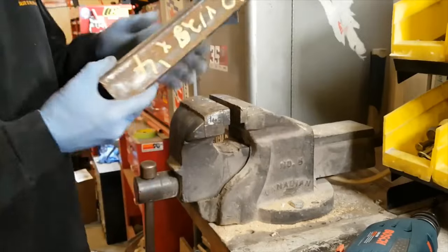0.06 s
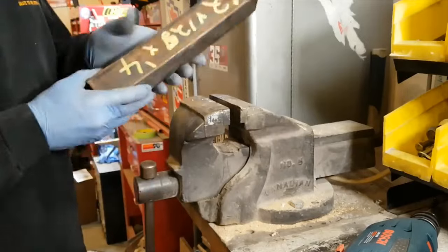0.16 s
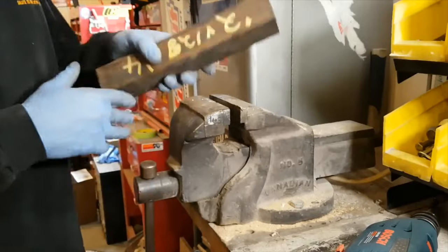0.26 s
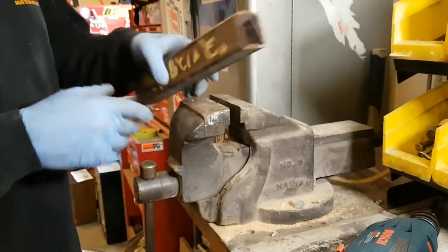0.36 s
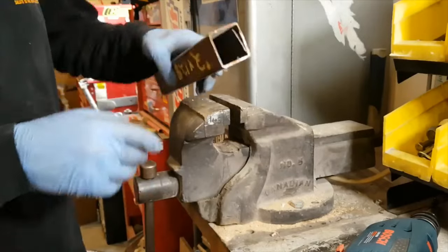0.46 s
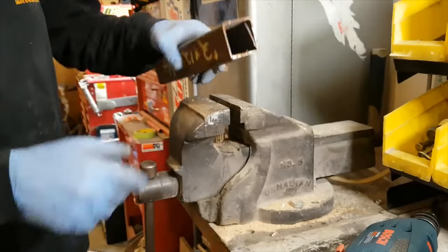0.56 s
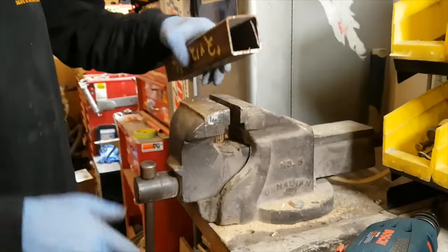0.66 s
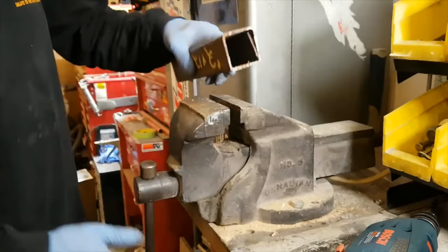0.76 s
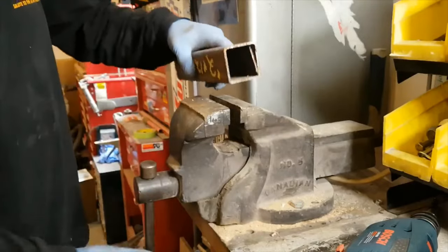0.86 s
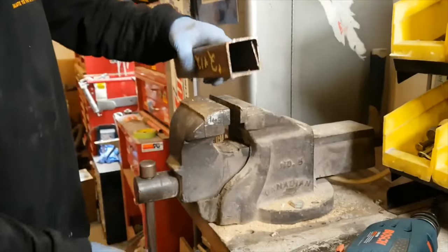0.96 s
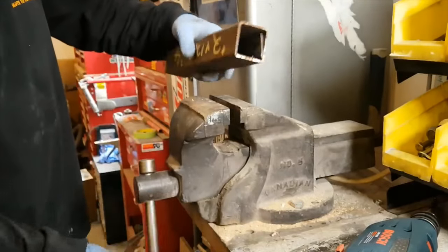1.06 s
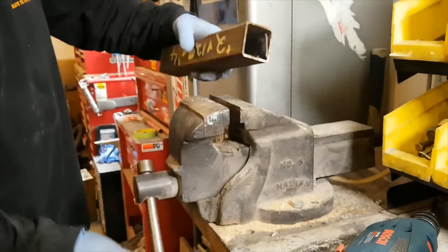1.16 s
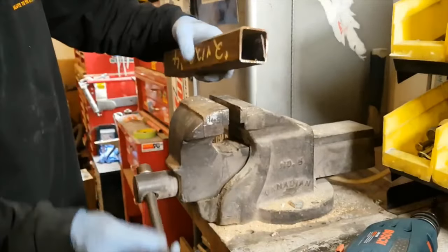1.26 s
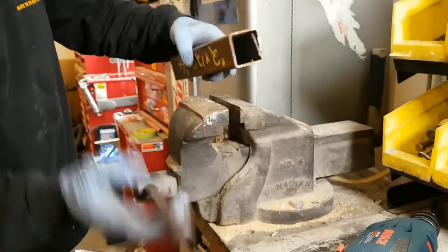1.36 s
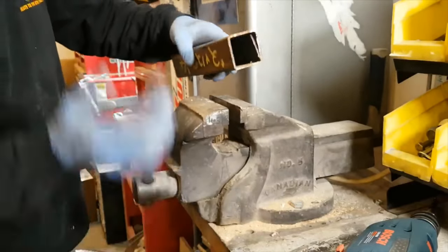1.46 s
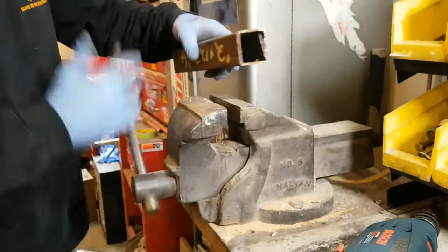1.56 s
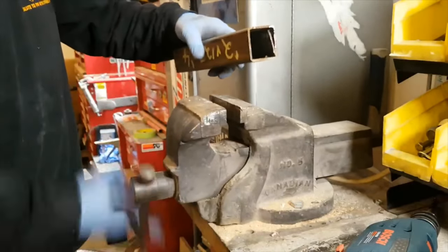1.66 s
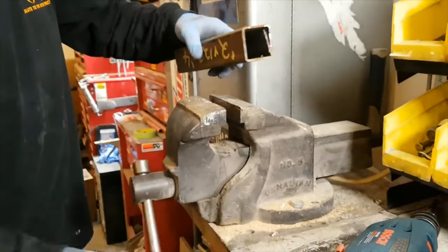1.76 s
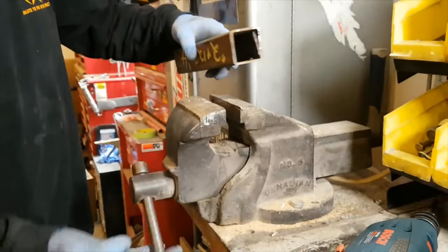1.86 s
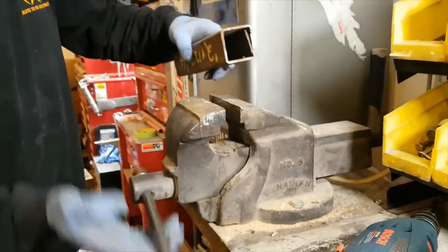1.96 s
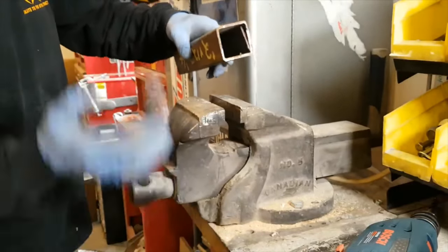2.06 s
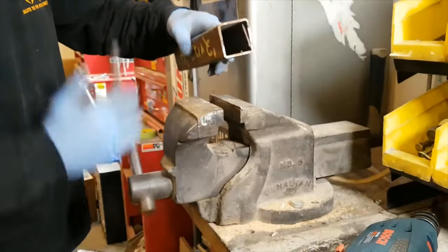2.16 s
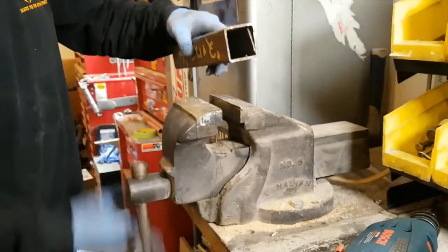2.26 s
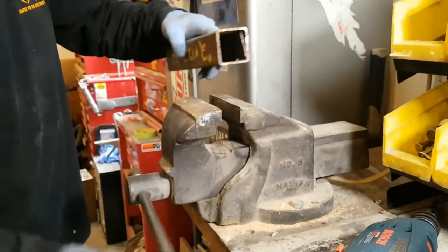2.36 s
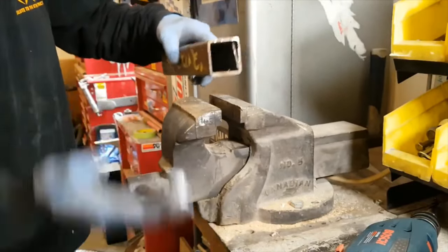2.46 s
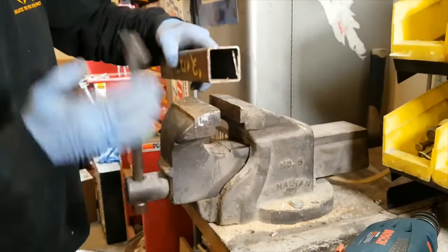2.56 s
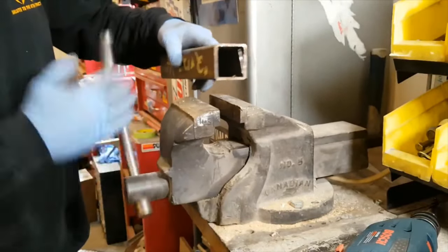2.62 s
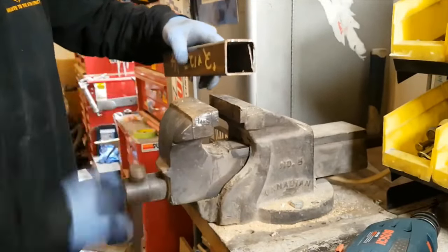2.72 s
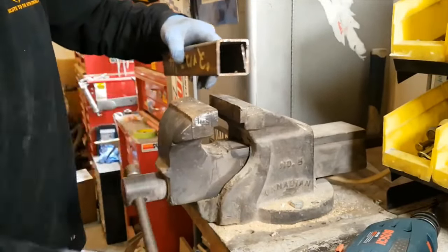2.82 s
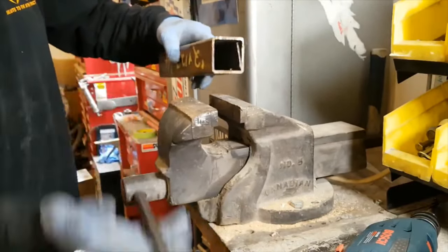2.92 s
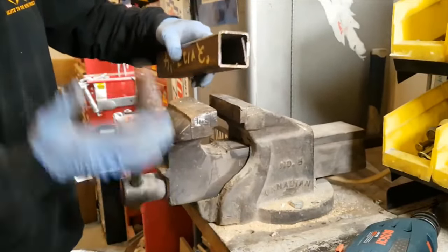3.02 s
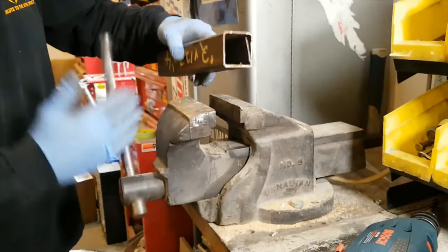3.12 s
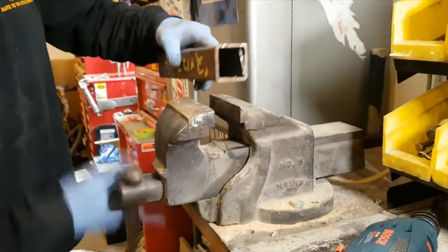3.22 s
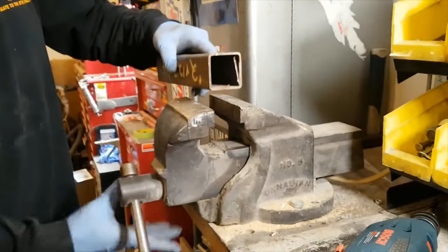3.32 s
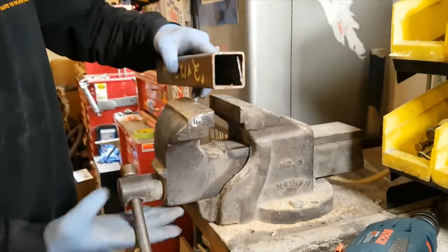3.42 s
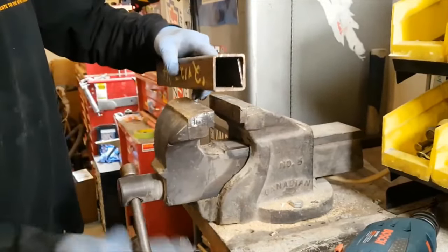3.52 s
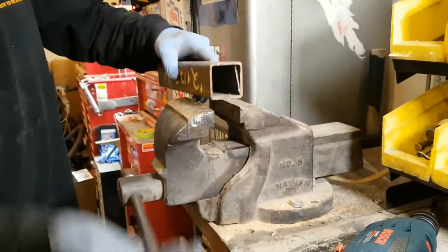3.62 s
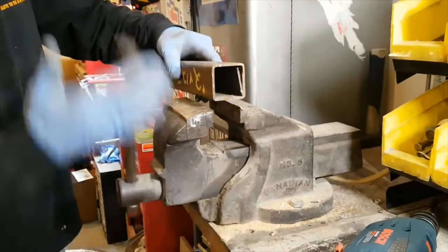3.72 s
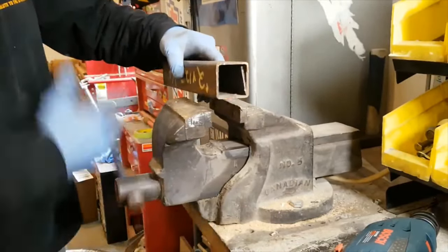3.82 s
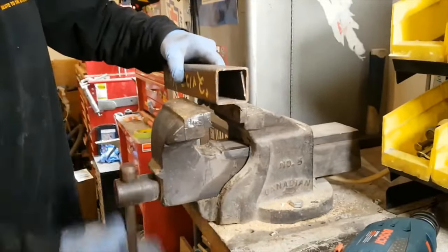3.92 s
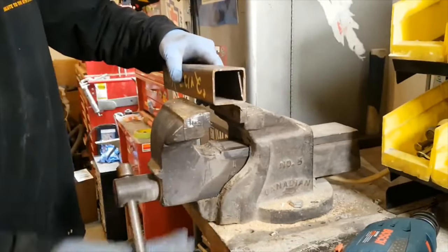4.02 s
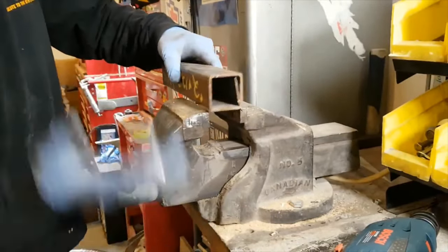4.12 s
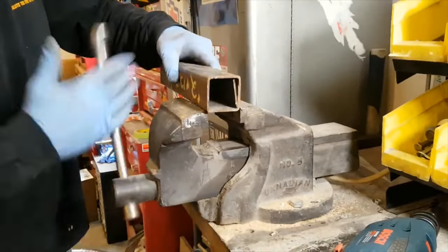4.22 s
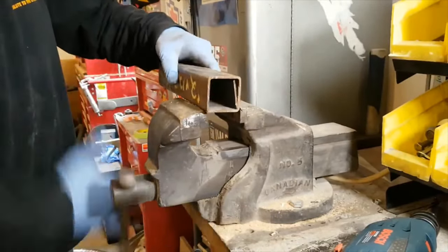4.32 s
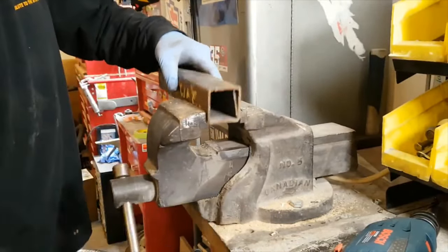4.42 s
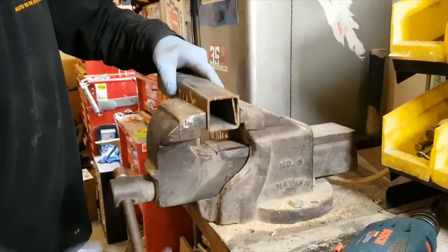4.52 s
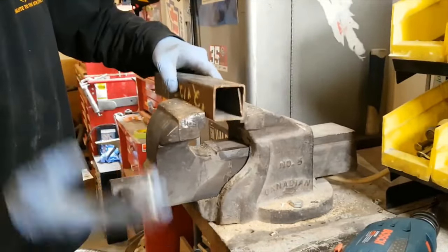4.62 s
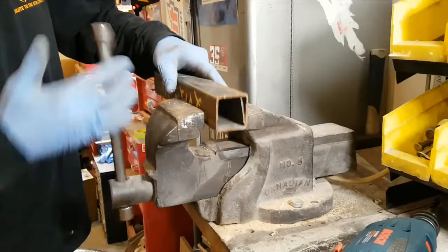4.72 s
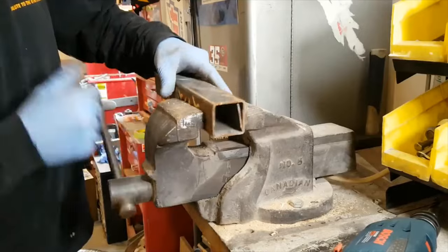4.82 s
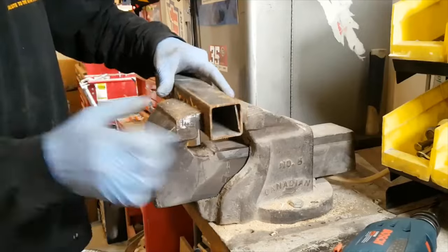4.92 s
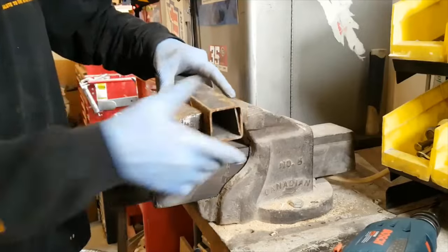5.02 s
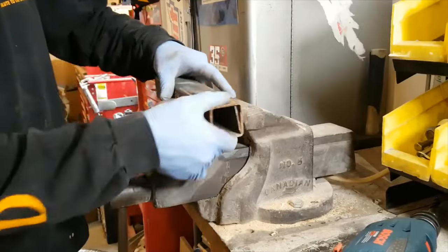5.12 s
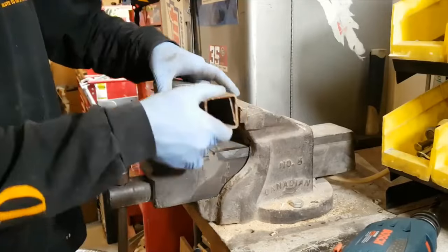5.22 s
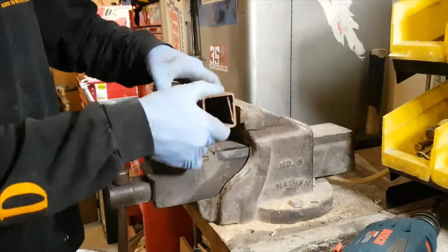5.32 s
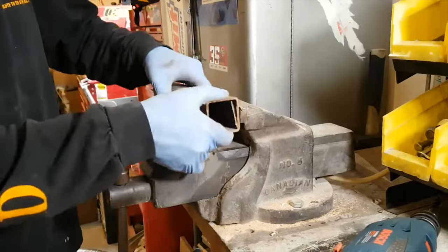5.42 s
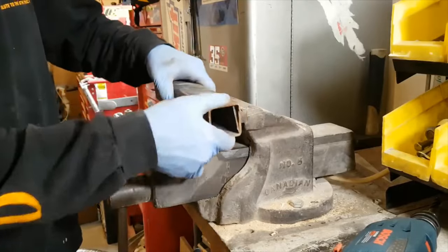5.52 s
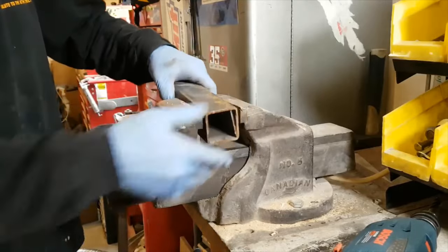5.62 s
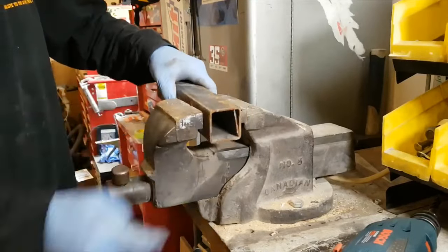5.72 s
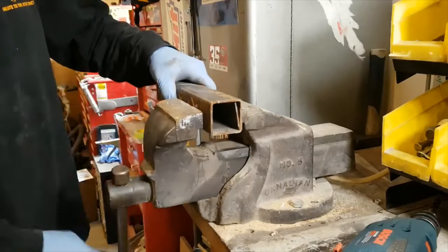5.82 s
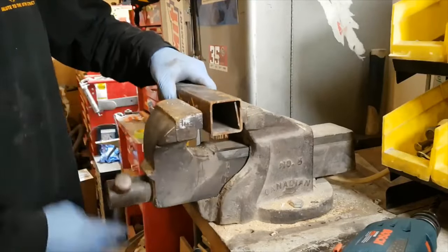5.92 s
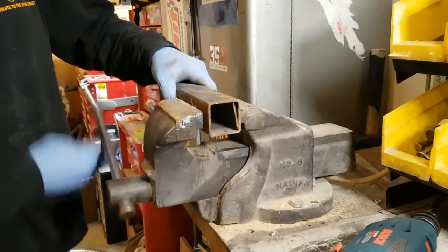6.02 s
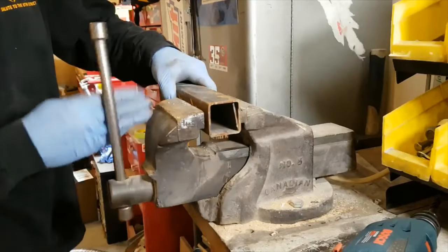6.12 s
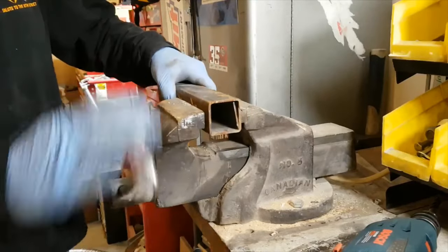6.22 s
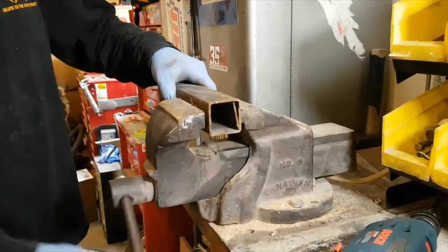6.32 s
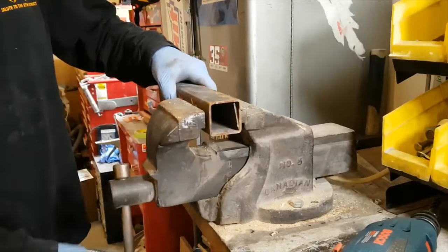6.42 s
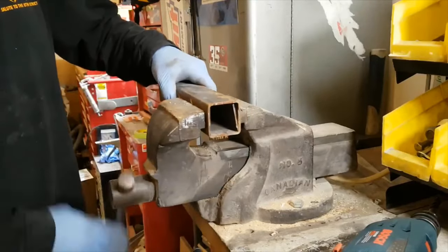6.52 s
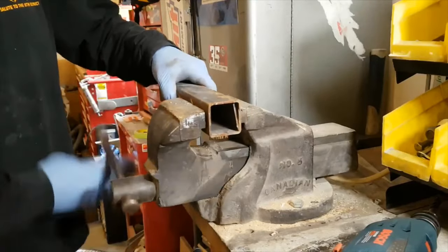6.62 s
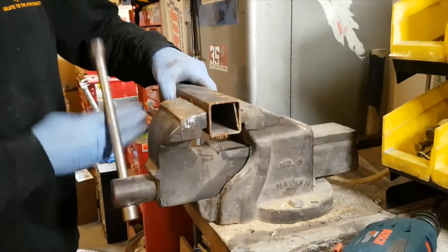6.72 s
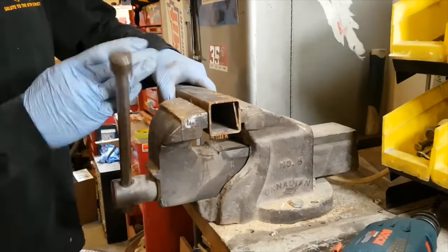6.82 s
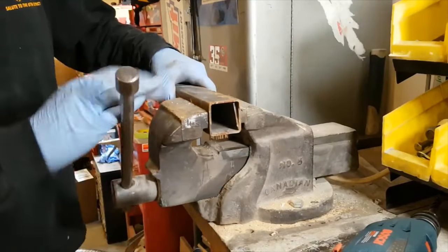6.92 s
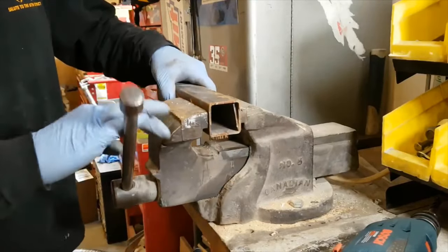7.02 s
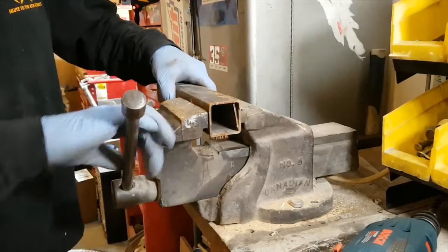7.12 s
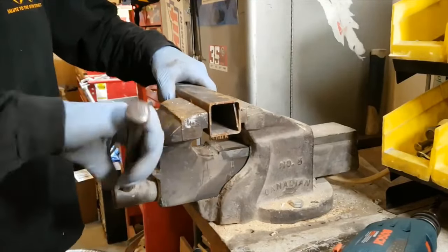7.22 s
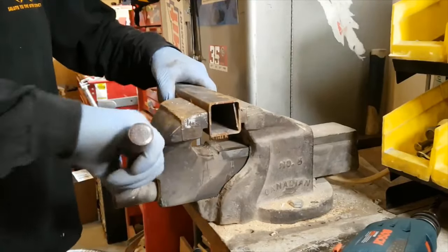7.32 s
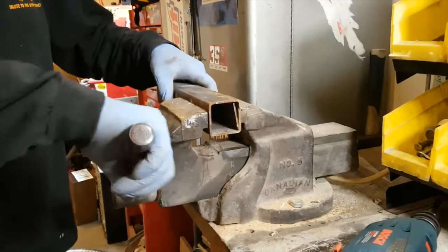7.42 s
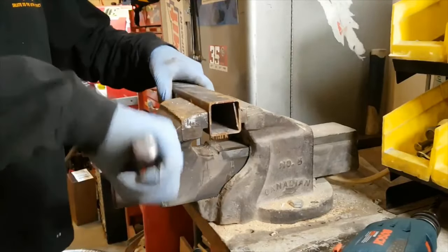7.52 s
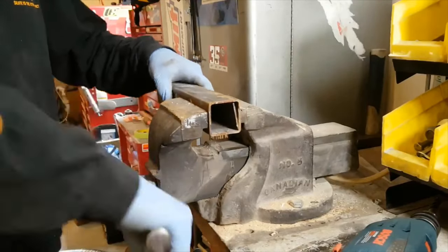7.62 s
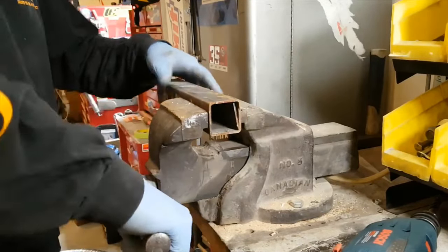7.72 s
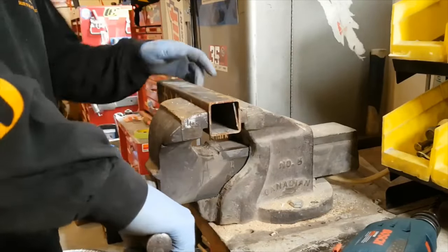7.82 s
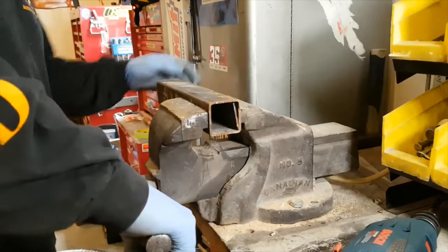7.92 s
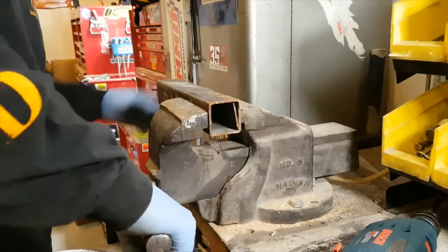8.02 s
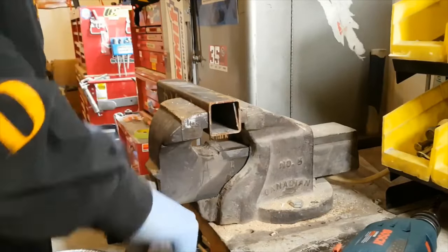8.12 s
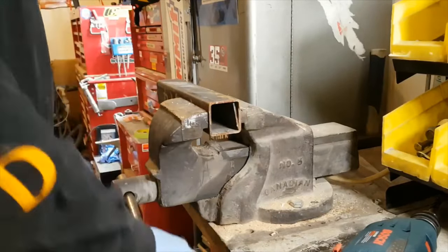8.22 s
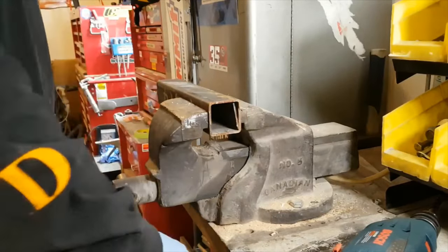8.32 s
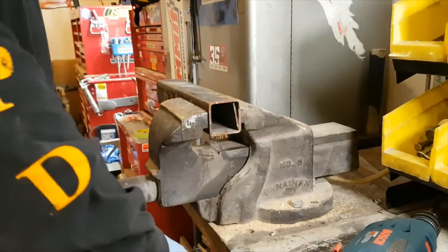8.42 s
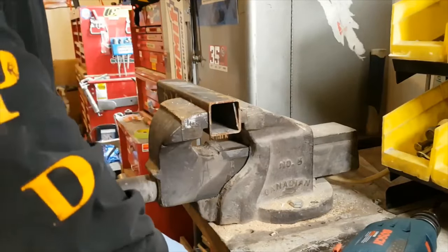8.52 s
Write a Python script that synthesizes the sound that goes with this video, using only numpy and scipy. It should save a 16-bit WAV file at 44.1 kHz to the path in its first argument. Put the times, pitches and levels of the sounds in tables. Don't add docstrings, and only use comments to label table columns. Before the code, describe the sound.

A heavy iron vise judders and knocks as its screw is cranked, a steel tube clinks in the jaws, then the handle bar drops with hollow clanks.

```python
import sys
import numpy as np
from scipy import signal
from scipy.fft import rfft, irfft, next_fast_len
from scipy.io import wavfile
from scipy.ndimage import uniform_filter1d

SR = 44100
rng = np.random.default_rng(int(sys.argv[2]) if len(sys.argv) > 2 else 0)


def ratio(d):
    e = np.asarray(d, float) / 20
    return 10 ** e


def generate_wav(signal):
    frames = np.transpose(np.atleast_2d(signal))
    scaled = np.clip(frames, -1, 1) * 32767
    pcm = np.round(scaled).astype(np.int16)
    wavfile.write(sys.argv[1], SR, pcm)


N = 377937


def evened(x):
    return x / np.sqrt(np.mean(x ** 2) + 1e-20)


def read(points, hz):
    f, value = np.transpose(points)
    return np.interp(np.log(hz + 1), np.log(f + 1), value)


def coloured(x, gain):
    size = next_fast_len(x.shape[-1])
    spectrum = rfft(x, size) * gain(np.fft.rfftfreq(size, 1 / SR))
    return irfft(spectrum, size)[..., :x.shape[-1]]


def add(mix, s, sound):
    part = mix[..., round(s * SR):][..., :sound.shape[-1]]
    part += sound[..., :part.shape[-1]]


def grains(count, per_s, spread_db):
    chance, sign, when = rng.random((count, 3)).T
    size = ratio(-spread_db * np.log(chance + 0.0024)) * np.sign(sign - 0.5)
    return evened(size * (when < per_s / SR))


def dying(spectrum, t60, count):
    t, nodes = np.arange(count) / SR, np.geomspace(20, 20000, 8)
    hz = np.fft.rfftfreq(count, 1 / SR)
    tents = [read(list(zip(nodes, tent)), hz) for tent in np.eye(len(nodes))]
    bands = irfft(rfft(rng.standard_normal(count)) * tents, count)
    decay = ratio(-60 * t / read(t60, nodes)[:, None])
    ring = rfft((bands * decay).sum(0))
    ring /= np.sqrt(abs(uniform_filter1d(abs(ring) ** 2, size=count // 200)) + 1e-12)
    ring = irfft(ring * ratio(read(spectrum, hz)), count) * np.linspace(1, 0, count)
    return ring / np.linalg.norm(ring)


def brushes(rows):
    t = np.arange(0, N + 64, 64) / SR
    s, db, rise, fall = np.transpose(rows)[:, :, None]
    away = np.maximum((s - t) / rise, (t - s) / fall)
    level = ratio(db - 20 * away).sum(0)
    return np.interp(np.arange(N) / SR, t, level)


# [f/Hz, level/dB]
MOTOR_LINES = [(119.3, -54.5), (253.0, -66), (296.1, -86.5), (393.0, -86.5), (419.9, -66), (506.0, -76.5),
               (586.8, -76), (672.9, -87), (759.0, -78)]
# [f/Hz, level/dB per Hz]
AIR_SPECTRUM = [(15, 2.5), (60, -13.5), (120, -9), (250, -11), (420, -12.5), (800, -20.5), (1500, -26),
                (3000, -29), (6000, -36.5), (12000, -34), (16000, -33)]
AIR_DB = -58.5


def background():
    t, slow = np.arange(N) / SR, np.arange(0, N + 2048, 2048) / SR
    waver = uniform_filter1d(rng.standard_normal((len(MOTOR_LINES), 2, len(slow))), size=3)
    lines = np.zeros(N)
    for (hz, db), (level_waver, phase_waver) in zip(MOTOR_LINES, waver):
        level = np.sqrt(2) * ratio(db + 2.0 * np.interp(t, slow, level_waver))
        lines += level * np.sin(2 * np.pi * hz * t + 2.2 * np.interp(t, slow, phase_waver))
    air = coloured(rng.standard_normal((2, N)), lambda hz: ratio(read(AIR_SPECTRUM, hz)))
    return lines * ratio(np.array([[-1.2], [1.2]])), ratio(AIR_DB) * evened(air)


# [loudest t/s, level/dB, rise t/s, fall t/s]
RUSTLES = [(.03, -67, 0.082, 0.058), (.31, -58, 0.18, 0.056), (.44, -62, 0.11, 0.099), (.6, -62, .05, 0.1),
           (1.17, -68, .03, 0.13), (1.868, -57.5, .1, 0.038), (2.47, -52, 0.0086, 0.055),
           (3.45, -65, 0.028, 0.18), (3.622, -61.5, 0.058, 0.096), (4.534, -42, 0.033, 0.07),
           (5.2, -59, 0.11, 0.18), (5.4, -71, 0.059, 0.14), (5.632, -71, 0.074, 0.085),
           (6.35, -51.5, 0.19, 0.14), (6.59, -76, 0.043, .15), (6.9, -49, 0.027, 0.12),
           (7.25, -65.5, 0.13, 0.23), (7.55, -64, 0.14, 0.069), (7.77, -58, 0.19, 0.1),
           (8.222, -69.5, 0.021, 0.4), (8.35, -55, 0.0074, 0.056), (8.438, -42.5, 0.004, 0.024),
           (8.53, -47.5, 0.0061, 0.021)]
# [f/Hz, level/dB per Hz]
CLOTH_SPECTRUM = [(500, -20), (1500, 9), (3000, 9), (6000, 6), (11000, 10), (14500, 7), (16200, -23.5)]
# [loudest t/s, level/dB, rise t/s, fall t/s]
WRINGS = [
    (7.77, -51, 0.23, 0.085),
    (7.92, -60, 0.13, 0.067),
    (8.05, -61, 0.026, 0.078),
]
# [low f/Hz, high f/Hz]
WRING_BAND = [350, 2500]


def rustle():
    fizz = np.array([grains(N, per_s=4300, spread_db=3.0) for _ in range(2)])
    wring = signal.lfilter(*signal.butter(2, WRING_BAND, "band", fs=SR), fizz[::-1] + fizz[0])
    cloth = evened(coloured(fizz, lambda hz: ratio(read(CLOTH_SPECTRUM, hz))))
    return brushes(RUSTLES) * ratio(7.5) * cloth + brushes(WRINGS) * evened(wring)


# [t/s, level/dB, T60 t/s]
HANDLE_TICKS = [
    (0.2019, -73, 0.04),
    (2.933, -37, 0.055),
    (3.2784, -40, 0.03),
    (3.419, -38.5, 0.068),
    (3.9762, -39, 0.04),
    (4.604, -23.5, 0.024),
    (5.8915, -45, 0.074),
]
# [low f/Hz, high f/Hz]
TICK_BAND = [6540, 16000]
# [t/s, level/dB]
BAR_BITES = [
    (6.769, -37),
    (6.845, -38),
]
BAR_HZ, BAR_T60 = 4870, 0.6
# [t/s, level/dB, T60 t/s]
BAR_DROPS = [
    (8.351, -31, 0.44),
    (8.436, -26, 0.36),
    (8.527, -29, 0.32),
]
# [f/Hz, level/dB per Hz]
DROP_SPECTRUM = [(120, -12), (220, -14), (300, -7), (640, -13), (1500, -13.5), (2400, -11.5), (5000, -21),
                 (8100, -35), (11100, -27), (16000, -56)]


def handle():
    out, t = np.zeros(N), np.arange(8192) / SR
    band = signal.butter(2, TICK_BAND, "band", fs=SR)
    for s, db, t60 in HANDLE_TICKS:
        add(out, s, ratio(db - 60 * t / t60) * signal.lfilter(*band, rng.standard_normal(len(t))))
    notes = np.sin(2 * np.pi * BAR_HZ * t)
    notes += 0.7 * np.sin(2 * np.pi * (BAR_HZ + 38) * t)
    notes += 0.6 * np.sin(2 * np.pi * (BAR_HZ - 61) * t)
    for s, db in BAR_BITES:
        add(out, s, ratio(db - 60 * t / BAR_T60) * notes * np.linspace(1, 0, len(t)))
    for s, db, t60 in BAR_DROPS:
        decay = [(300, t60), (12000, 0.19 * t60)]
        add(out, s, ratio(db + 18.5) * dying(DROP_SPECTRUM, decay, count=len(t)))
        add(out, s, ratio(db - 19.0 - 60 * t / 2.3) * np.sin(2 * np.pi * 300 * t))
    return out


# [loudest t/s, level/dB, rise t/s, fall t/s]
SCRAPES = [
    (5.267, -47, 0.0097, 0.14),
    (5.451, -53.5, 0.046, 0.056),
    (0.316, -60.5, .1, 0.13),
    (0.46, -66, .05, .08),
    (0.55, -75, .03, .08),
    (7.75, -59, 0.099, 0.11),
    (8.23, -65, .015, 0.11),
    (10, -63, 0.013, 0.25),
]
RUBBED_MODES_HZ = [2040, 3180, 3330, 4400, 5190, 5910, 6820, 8390, 9430, 10600]
# [width f/Hz, level/dB]
RUBBED_MODES = [(36, 1.5), (45.8, 3), (40, 8), (90, -11), (60, -1), (90, -3), (118.5, -14), (46, -13),
                (109.2, -8), (41, -11)]
WALL_MODES_HZ = [2070, 3036, 3165, 3241, 3478, 3862, 4370, 5170, 5960, 6630, 8150, 9400, 10290, 11400]
WALL_T60 = [0.23, 0.2, 0.19, 0.28, 0.3, 0.21, 0.26, 0.14, 0.18, 0.16, 0.18, .2, 0.43, .15]
GRIP_LEVELS = [
    [7, -21.5, -23, -25.5, 6.5, -10, 0.5, -30, -3, -14.5, -30, -14, -32, -26.5],
    [-7.5, -4.5, 15, -12, -27, -14, -22, -10.5, -21, -6.5, -24, -24.5, -31, -32.5],
    [-4, 1.5, 8.5, -2, -7.5, -6, -12, 3, 0, -22, -23, -21, -25, -28],
    [-1, -7.5, 10.5, -16, 1, 8, -11.5, -9, -5, -17, -20, -20, -28, -23],
    [4.5, -20, 2, 6.5, -19, -2.5, -15, -2, -4, -13, -26, -19.5, -16.5, -19],
    [10.5, -22, -14, -5, -12.5, -16, -22, -8, -24, -24, -25, -25.5, -27, -34],
    [-7, -18, 1, -8.5, -18.5, -17, -2, -9.5, -17.5, -13, -4, 0, -17, -15.5],
]
# [t/s, crack level/dB, ring level/dB, t/s until a hand damps it]
GRIP_CLINKS = [
    [(3.9634, -46.5, -48, .13)],
    [(4.311, -64.5, -32.5, .14)],
    [(4.4408, -32, -30.5, .15), (4.6059, -37.5, -46.5, 0.1)],
    [(4.452, -52, -37.5, .1), (4.4692, -41, -38, 0.14)],
    [(5.7433, -33, -38.5, 0.15), (5.904, -48, -56.5, 0.062)],
    [(6.59, -55.5, -56.5, 0.12)],
    [(8.2172, -70, -69, 0.12)],
]
QUICK_DB, QUICK_T60, QUICK_TILT_DB = 0.5, 0.046, 8.5
TWIN_DB, TWIN_HZ = -7, 45
WOBBLE, GRIT_DB = 0.35, -5.5


def struck_walls(levels):
    t = np.arange(SR // 4) / SR
    hz, db, t60 = np.array([WALL_MODES_HZ, levels, WALL_T60])[:, :, None]
    twin_hz = hz + TWIN_HZ * np.sin(hz)
    beating = np.sin(2 * np.pi * hz * t) + ratio(TWIN_DB) * np.sin(2 * np.pi * twin_hz * t)
    quick = ratio(QUICK_DB + QUICK_TILT_DB * np.log2(hz / 5000) - 60 * t / QUICK_T60)
    return ratio(db) * (ratio(-60 * t / t60) + quick) * beating


def tube():
    out, t = np.zeros(N), np.arange(SR // 4) / SR
    for levels, clinks in zip(GRIP_LEVELS, GRIP_CLINKS):
        modes = struck_walls(levels)
        for s, crack_db, ring_db, held in clinks:
            noise = rng.standard_normal(len(t))
            crack = signal.lfilter([0.5, 0.5], [1, -0.6], noise)
            slow = evened(uniform_filter1d(uniform_filter1d(noise, size=300), size=300))
            ring = np.zeros(len(t))
            for k, mode in enumerate(modes):
                ring += mode * (1 + WOBBLE * np.roll(slow, len(t) * k // len(modes)))
            damped = ratio(ring_db - 580 * np.maximum(t - held, 0)) * ring
            add(out, s, damped + ratio(crack_db - 60 * t / 0.097) * crack)
    rubbed = np.zeros(len(t))
    for hz, (width, db) in zip(RUBBED_MODES_HZ, RUBBED_MODES):
        rubbed += ratio(db) * width * np.exp(-np.pi * width * t) * np.sin(2 * np.pi * hz * t)
    rub = grains(N, per_s=750, spread_db=4.0)
    grit = signal.lfilter(*signal.butter(1, [1500, 7000], "band", fs=SR), rub)
    rubbing = evened(signal.oaconvolve(rub, rubbed)[:N]) + ratio(GRIT_DB) * evened(grit)
    return out + brushes(SCRAPES) * rubbing


EDGE_SHARE, SIZZLE_DB = 1.7, -19


def ranges_db(level_db, bench_db, bright_db, edge_db):
    edge = edge_db + EDGE_SHARE * bright_db
    return level_db + np.array([0 * level_db, bench_db, bright_db, edge, edge + SIZZLE_DB])


START_DB, RISE_S = -4, 0.0063
SWELL_DB = -4
SETTLE_DB, SETTLE_DB_PER_S = -30.5, 45.5
FULL_DB = -18
BENCH_DB, BENCH_TILT = -5, -0.26
DULL_START_DB = -1
EDGE_DB, BITE_TILT, EDGE_TILT = -13, 0.73, 0.08


def stroke(push, effort_db, bright_db, release):
    t = np.arange(0, push + 0.55, 1 / SR)
    after = np.maximum(t - push, 0)
    to_go = np.clip(1 - t / push, 0, 1)
    build = START_DB * np.clip(1 - t / min(RISE_S, push), 0, 1) + SWELL_DB * to_go
    dying_db = 20 * np.log10(ratio(-release * after) + ratio(SETTLE_DB - SETTLE_DB_PER_S * after))
    db = effort_db + build + dying_db
    bench_db = BENCH_DB + BENCH_TILT * (db - FULL_DB)
    bite_db = bright_db + BITE_TILT * dying_db + DULL_START_DB * to_go
    drive = ranges_db(db, bench_db, bite_db, EDGE_DB - EDGE_TILT * dying_db)
    return ratio(drive) * np.clip(10 * (t[-1] - t), 0, 1)


# [f/Hz, level/dB per Hz]
CASTING_SPECTRUM = [(15, -57.5), (35, -47), (60, -18), (88, 3), (170, 4), (230, 5.5), (340, -2.5),
                    (430, -2.5), (680, -4.5), (1000, -6), (1800, -7), (2700, -15), (3600, -20.5),
                    (5000, -30.5), (8000, -43.5), (16000, -59.5)]
# [f/Hz, T60 t/s]
CASTING_DECAY = [(60, 0.61), (300, 0.053), (1500, 0.093), (5000, 0.0036), (15000, 0.011)]
CASTING_MODES_HZ = [90, 222, 262, 512, 562, 675, 1150, 1678, 1810, 2125, 2440, 2583, 3160, 3680, 4830]
# [width f/Hz, level/dB]
CASTING_WIDTHS = [(10, -21.5), (40.3, 5.5), (40.05, -1), (42, -5), (38.1, -4.5), (30, -9.5), (80, -12),
                  (35, -5.5), (50, -5.5), (35, -13), (70, -11), (69.6, -14.5), (70, -17), (60, -21),
                  (120, -25.5)]
IRON_Q = 42


def casting():
    t = np.arange(8192) / SR
    hz = np.array(CASTING_MODES_HZ)[:, None]
    width, db = np.transpose(CASTING_WIDTHS)[:, :, None]
    width = np.maximum(width, hz / IRON_Q)
    decay = ratio(db) * width * np.exp(-np.pi * width * 0.7 * t)
    modes = (decay * np.sin(2 * np.pi * (hz * t + rng.random(hz.shape)))).sum(0)
    ring = dying(CASTING_SPECTRUM, CASTING_DECAY, count=len(t))
    ring += ratio(-3) * modes / np.linalg.norm(modes)
    ring *= np.sin(np.pi / 2 * np.clip(t * 1000, 0, 1)) ** 2
    edges = [280, 420, 1100, 1500, 2600, 3500, 6500, 9500]
    ranges = np.eye(5)[[1, 0, 0, 2, 2, 3, 3, 4]].T
    parts = [coloured(ring, lambda hz: read(list(zip(edges, r)), hz)) * (t < 0.15) for r in ranges]
    return np.array([p / np.linalg.norm(p) for p in parts])


# [from t/s, legs level/dB, bench top level/dB, slide level/dB, jaw plate level/dB]
LARGE_SEATING = [(1.0, -14.5, -20, -24.5, -18), (1.4, -9.5, -12, -13, -22.5),
                 (1.97, -15.5, -20.5, -15, -19), (2.3, -12.5, -13.5, -22.5, -27.5),
                 (2.58, -22, -20.5, -21.5, -10), (2.95, -18.5, -13.5, -32, -13.5),
                 (3.25, -26, -6, -16, -24), (3.6, -9, -15, -23.5, -17.5), (4.12, -9.5, -13, -13, -18),
                 (4.6, -10, -21.5, -20, -8.5), (5.101, -12.5, -16, -21, -16.5),
                 (5.7, -14.5, -19.5, -14.5, -16.5), (6.1, -11.5, -15.5, -11.5, -21),
                 (6.7, -15.5, -13.5, -11.5, -13.5)]
# [f/Hz, width f/Hz]
LARGE_PARTS = [(88, 14), (365, 15), (505, 12), (675, 10)]
# [nut level/dB, screw level/dB, hub level/dB, cap level/dB]
SMALL_PART_SEATING = [(-26, -26.5, -22, -19), (-20, -25, -21, -16.5), (-24.5, -15.5, -4.5, -23),
                      (-21, -29, -21, -23), (-18.5, -21, -23, -25), (-19, -33, -24, -22),
                      (-23, -27, -20, -23), (-28.5, -15, -18.5, -19.5), (-15.5, -17, -10.5, -21),
                      (-23.5, -24.5, -31, -36), (-22, -22, -22, -22), (-26, -20.5, -13, -17),
                      (-18, -20, -18, -18), (-16, -15, -18, -2)]
# [f/Hz, width f/Hz]
SMALL_PARTS = [(1780, 34), (2580, 60), (3165, 54), (3680, 70)]


def loose_parts(force):
    start, *levels = np.transpose(LARGE_SEATING)
    levels += list(np.transpose(SMALL_PART_SEATING))
    turn_at = np.clip(np.searchsorted(start, np.arange(N) / SR) - 1, 0, None)
    drives = force[[1, 1, 0, 0, 2, 2, 3, 3]]
    out = np.zeros(N)
    for (hz, width), db, drive in zip(LARGE_PARTS + SMALL_PARTS, levels, drives):
        r, turn = np.exp(-np.pi * width / SR), 2 * np.pi * hz / SR
        size = np.sqrt(1 - r)
        poles = [1, -2 * r * np.cos(turn), r * r]
        out += signal.lfilter([size, 0, -size], poles, ratio(db)[turn_at] * drive)
    return out


# [start t/s, push t/s, effort level/dB, brightness level/dB, release dB/s]
JAW_PUSHES = [(1.152, 0.0069, -42, -15.5, 201), (1.455, 0.0054, -34, -16, 155),
              (1.475, 0.052, -24, 0.5, 204.5), (1.53, 0.065, -17.5, 2.5, 157),
              (1.995, 0.025, -40.5, -9.5, 399), (2.084, 0.013, -22, -4.5, 253),
              (2.123, 0.066, -19, 2.5, 163), (2.324, 0.0061, -33.5, -20, 246),
              (2.412, 0.004, -30, -3.5, 148), (2.596, 0.012, -44, -10, 210),
              (2.626, 0.009, -28.5, -1.5, 206), (2.649, 0.014, -21.5, 0.5, 144.5),
              (2.803, 0.0042, -43, 1, 126.5), (2.985, .012, -50.5, -3.5, 164),
              (3.118, 0.0052, -39, -10, 252), (3.149, 0.0035, -39.5, -13, 251),
              (3.187, 0.005, -47, -10, 162.5), (3.294, 0.0026, -33, -9, 168.5),
              (3.612, 0.0086, -51, -26, 154), (3.702, 0.016, -29, -2, 302.5),
              (3.729, 0.026, -24.5, -4, 255.5), (3.781, 0.038, -15, -1.5, 206.5),
              (3.86, 0.01, -32, -0.5, 141.5), (4.134, 0.01, -29.5, -18.5, 192.5),
              (4.166, 0.042, -16, -0.5, 251), (4.224, 0.047, -11, 2.5, 174.5),
              (4.61, 0.032, -34, -5.5, 201), (4.652, 0.095, -19, -4.5, 250), (4.722, 0.059, -20, -3, 254.5),
              (4.806, 0.027, -22.5, 1, 254.5), (4.832, 0.042, -31, -1.5, 250.5),
              (4.868, 0.043, -27, -4, 251), (4.897, 0.046, -33, -8, 258), (4.939, 0.0084, -26.5, -3, 252.5),
              (4.964, 0.038, -18, -5.5, 269), (5.257, 0.014, -69, 15, 98.5), (5.899, 0.026, -37, -20, 204),
              (5.974, 0.0088, -25.5, -13, 301.5), (5.994, 0.019, -22.5, -6, 300),
              (6.047, 0.029, -27.5, 1, 399.5), (6.139, 0.057, -20, -6.5, 254.5),
              (6.19, 0.034, -14, -0.5, 193), (6.769, 0.043, -21, -3, 251),
              (6.828, 0.022, -22.5, 4.5, 154.5)]
# [t/s, blow level/dB, brightness level/dB]
JAW_KNOCKS = [(1.092, -40, -27), (1.154, -24.5, -12), (1.461, -24, -24), (1.472, -19, 0.5),
              (1.479, -11, -7), (1.489, -13.5, -1), (1.499, -10.5, 6.5), (1.529, -15, 3.5),
              (1.555, -11, 6), (1.572, -6.5, 9), (1.624, -11, -5), (1.721, -17, -2.5),
              (2.006, -19.5, -11.5), (2.085, -11.5, -1), (2.097, -17, -1), (2.121, -20.5, 16),
              (2.138, -7.5, 8.5), (2.16, -5.5, 0.5), (2.183, -5.5, -8), (2.266, -22.5, -1),
              (2.325, -10, 0), (2.416, -8, 0.5), (2.599, -23.5, -23), (2.625, -14, -10),
              (2.647, -7, 4.5), (2.741, -31, -11), (2.807, -14, -8.5), (2.985, -19.5, -21),
              (3.121, -17, -19), (3.152, -21.5, -6.5), (3.189, -13.5, -11), (3.297, -15, -9.5),
              (3.306, -11, -5.5), (3.445, -37, -14.5), (3.468, -31, -13.5),
              (3.616, -33, -9), (3.703, -8, -3.5), (3.73, -10, 5), (3.761, -19.5, 1), (3.781, -11, 6),
                  (3.862, -9, 2.5), (3.883, -7, -9), (3.963, -17, -0.5), (4.138, -20.5, -10),
                  (4.164, -3, -1.5), (4.174, -6.5, -11), (4.225, -3.5, -3), (4.252, -9, 9.5),
                  (4.297, 1.5, -1.5), (4.424, -13, -12), (4.444, -8.5, 0.5), (4.47, -13, 4.5),
                  (4.608, -13, -2), (4.661, -8, 4), (4.719, -12.5, 6.5), (4.764, -14, -5.5),
                  (4.803, -13.5, 8.5), (4.845, -5, 3), (4.898, -8.5, 2.5), (4.939, -16, 4.5),
                  (4.965, -10, -1), (4.985, -0.5, 2.5), (5.015, -11, 5), (5.745, -26, 2.5),
                  (5.904, -26.5, 5.5), (5.935, -26.5, -4), (5.976, -12, -7), (5.996, -17.5, 3.5),
                  (6.035, -12.5, 1.5), (6.075, -15, -10.5), (6.147, -11.5, 2.5), (6.174, -11.5, 3),
                  (6.192, -8.5, 2.5), (6.322, -19.5, 3), (6.768, -18, 8.5), (6.776, -18.5, 14),
                  (6.831, -10.5, 1), (6.845, -11, 0.5)]
KNOCK_BENCH_DB, KNOCK_EDGE_DB = -1.5, -21
KNOCK_LEAD_S, CONTACT_S = 0.004, 0.0018


def vise():
    force = np.zeros((5, N))
    for s, *push in JAW_PUSHES:
        add(force, s, stroke(*push))
    force *= grains(N, per_s=1300, spread_db=2.0)
    k = np.arange(600)
    for s, blow_db, bright_db in JAW_KNOCKS:
        contacts = (rng.standard_normal(len(k)) * k * np.exp(-k / (CONTACT_S * SR))) ** 3
        drive = ranges_db(blow_db, KNOCK_BENCH_DB, bright_db, KNOCK_EDGE_DB)[:, None] + 12.5
        add(force, s - KNOCK_LEAD_S, ratio(drive) * contacts / np.linalg.norm(contacts))
    turn = 2 * np.pi * 7.0 * np.arange(N) / SR
    size, out = next_fast_len(N + 8192), 0
    for share in (np.cos(turn), np.sin(turn)):
        out = out + (rfft(force * share, size) * rfft([casting(), casting()], size)).sum(1)
    return irfft(out, size)[:, :N] + loose_parts(force)


# [t/s, level/dB, f/Hz]
BENCH_THUDS = [(1.159, -22.5, 102), (1.49, -17.5, 104), (1.994, -20.5, 121), (2.081, -17.5, 137),
               (2.317, -18, 133), (2.407, -22, 115), (2.804, -18.5, 124), (3.139, -24.5, 96),
               (3.298, -14, 111.4), (4.158, -19.5, 112), (4.413, -13.5, 93), (4.655, -18.5, 119.4),
               (5.972, -17.5, 91), (6.143, -17.5, 106), (6.774, -11.5, 102.5)]
THUD_RISE_S, THUD_T60, THUD_DB = 0.0014, 0.19, -6.5
SWAY_HZ, SWAY_DB = 42.2, -17
THUD_LEAD_S = 0.006


def bench():
    out, t = np.zeros(N), np.arange(SR // 3) / SR
    for s, db, hz in BENCH_THUDS:
        notes = np.sin(2 * np.pi * hz * t) + ratio(SWAY_DB) * np.sin(2 * np.pi * SWAY_HZ * t)
        level = ratio(db + THUD_DB - 60 * t / THUD_T60) * (1 - np.exp(-t / THUD_RISE_S))
        add(out, s - THUD_LEAD_S, level * notes)
    return out


# [f/Hz, T60 t/s]
SHOP_DECAY = [(80, 0.77), (250, 0.69), (1000, 0.39), (4000, 0.7), (12000, 0.18)]


def shop(paths):
    rise = np.clip(np.arange(32768) / (0.0022 * SR), 0, 1)
    spectrum = [(20, -0.5), (1000, -4.5), (20000, 1.0)]
    tails = [rise * dying(spectrum, SHOP_DECAY, count=len(rise)) for _ in paths]
    return signal.fftconvolve(paths, tails, axes=1)[:, :N]


# [f/Hz, coherence 0-1]
COHERENCE = [(30, .6), (80, .97), (250, .85), (600, .7), (1200, .55), (3000, .3), (6000, .1)]
# [f/Hz, lead/rad]
LEFT_LEAD = [(100, 0), (690, -.5), (1380, -2.5), (2580, -.8), (3450, -.4), (8000, 1.5)]
# [f/Hz, level/dB]
LEFT_LOUDER = [(60, -3.0), (180, -3.5), (550, -2.5), (1650, -2.5), (4970, -1.0), (15000, -0.5)]


def ports(paths):
    size = next_fast_len(N)
    hz, (a, b) = np.fft.rfftfreq(size, 1 / SR), rfft(paths, size)
    same = np.clip(read(COHERENCE, hz), 0, 1)
    louder = ratio(read(LEFT_LOUDER, hz) / 2)
    left = np.exp(1j * read(LEFT_LEAD, hz)) * louder
    right, other = same / louder, np.sqrt(1 - same ** 2) / louder
    flat = 2 / np.sqrt(abs(left + right) ** 2 + other ** 2)
    return irfft([a * left * flat, (a * right + b * other) * flat], size)[:, :N]


def scene():
    hum, air = background()
    cloth = rustle()
    small = handle() + tube()
    aside = coloured(small, lambda hz: np.exp(-1j * (hz / 90.0 + 1.5 * np.sin(hz / 140.0))))
    near = vise() + np.array([small, aside]) + bench()
    return ports(near + ratio(-5.0) * shop(near) + air) + hum + cloth


def top_cut(x):
    return signal.sosfilt(signal.butter(12, 16480, fs=SR, output="sos"), x)


def record(dry):
    power_db = 10 * np.log10(abs(uniform_filter1d((dry ** 2).mean(0), size=128)) + 1e-12)
    fall = np.arange(N) * 21.4 / SR
    peak_db = np.maximum.accumulate(power_db + fall) - fall
    over_db = np.maximum(peak_db + 12, 0)
    held = dry / ratio(0.9 * uniform_filter1d(over_db, size=128))
    # f/Hz, level/dB
    edges = [(10, -10.5), (45, -4), (70, 4.5), (15000, -4.5), (16000, -16.5), (16300, -46.5)]
    mix = coloured(held, lambda hz: ratio(read(edges, hz)))
    return top_cut(mix)


dry = scene()
out = record(dry)
generate_wav(out)
```